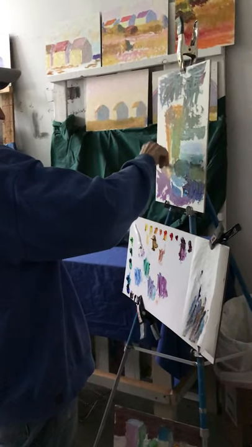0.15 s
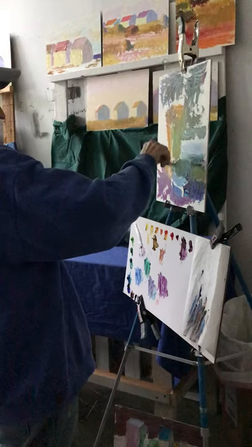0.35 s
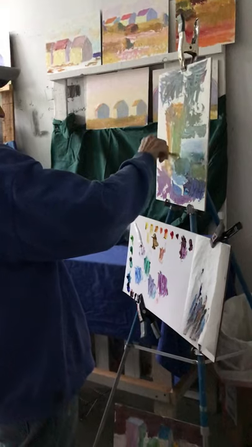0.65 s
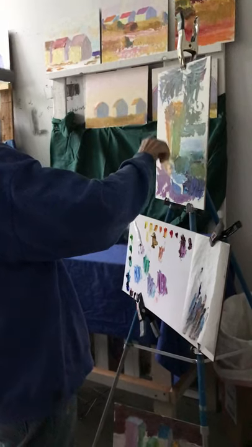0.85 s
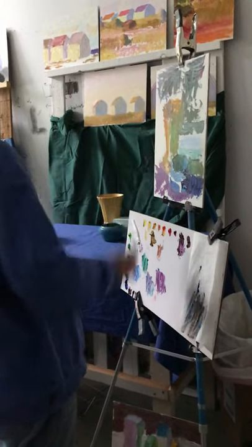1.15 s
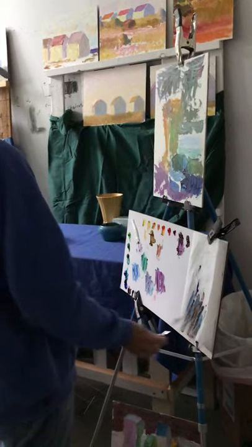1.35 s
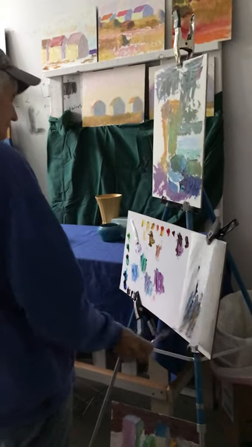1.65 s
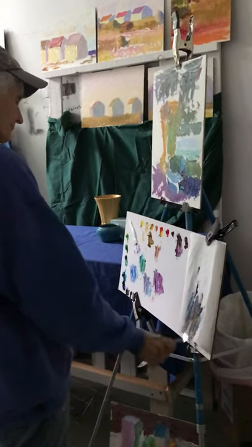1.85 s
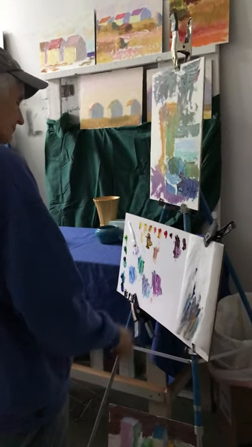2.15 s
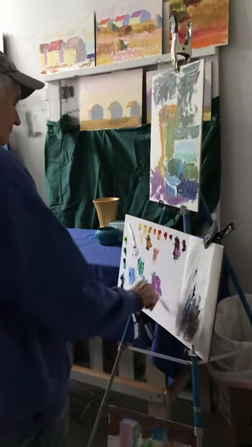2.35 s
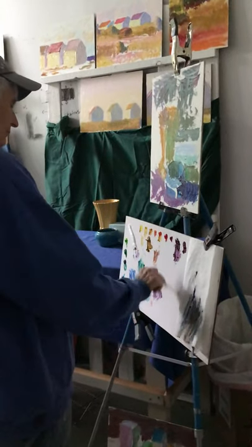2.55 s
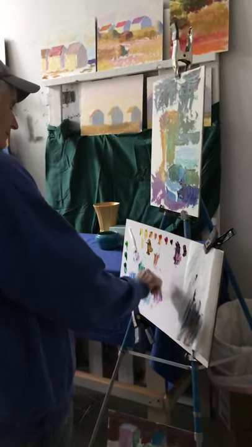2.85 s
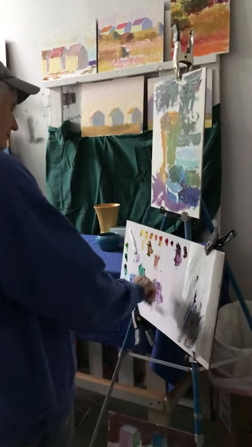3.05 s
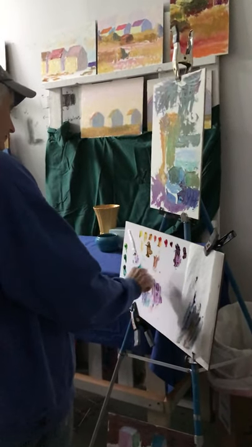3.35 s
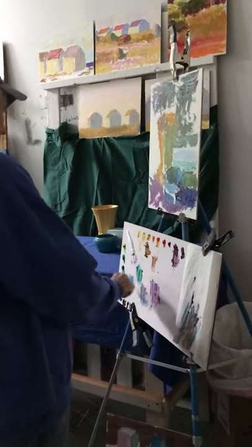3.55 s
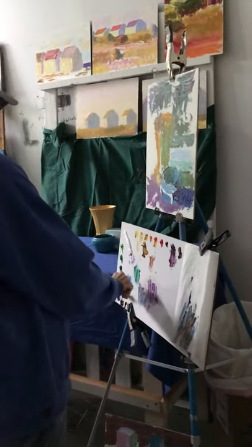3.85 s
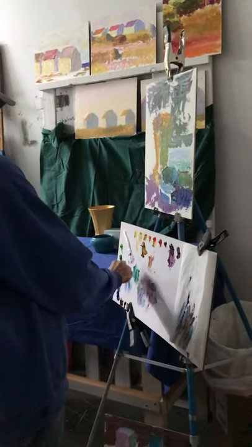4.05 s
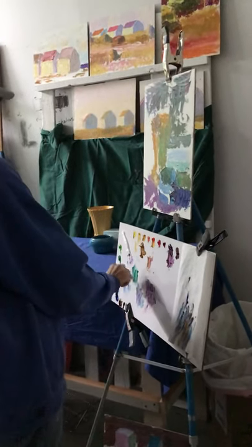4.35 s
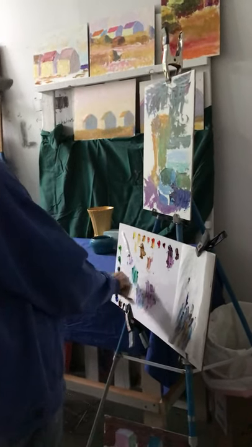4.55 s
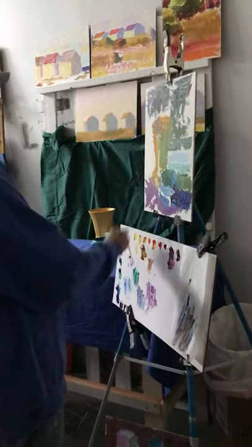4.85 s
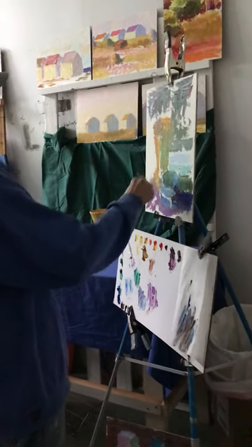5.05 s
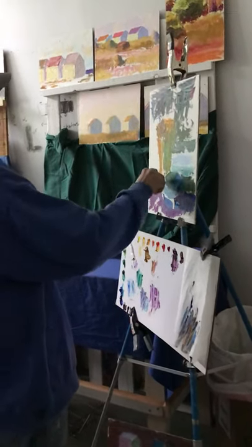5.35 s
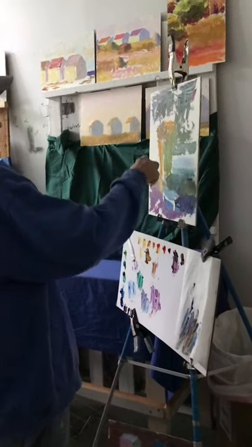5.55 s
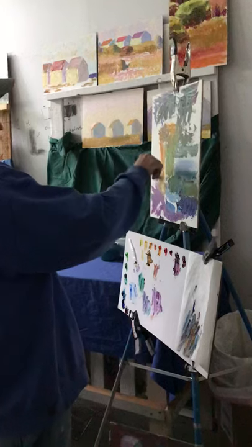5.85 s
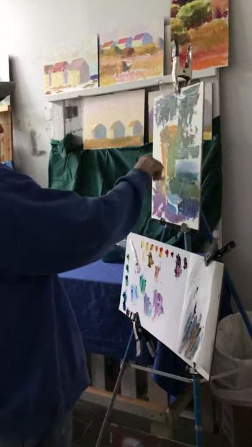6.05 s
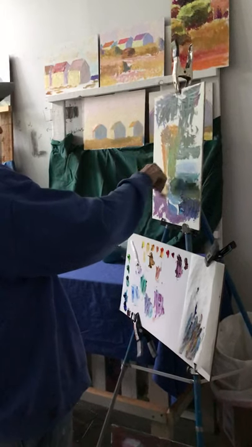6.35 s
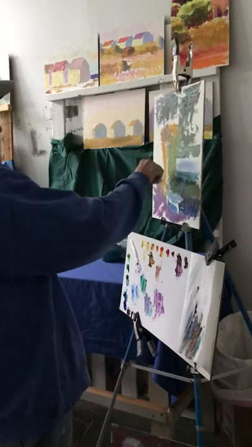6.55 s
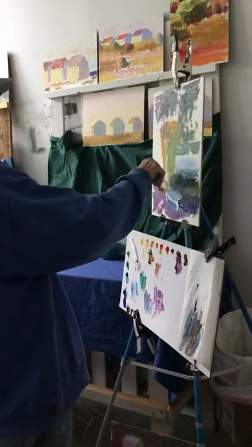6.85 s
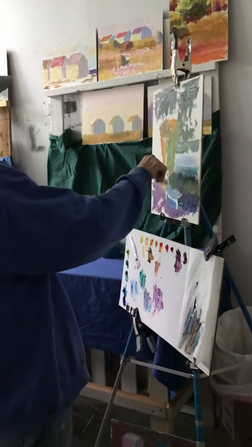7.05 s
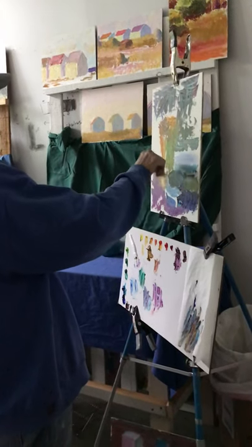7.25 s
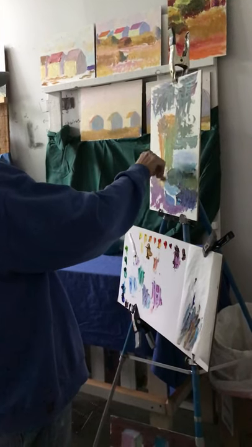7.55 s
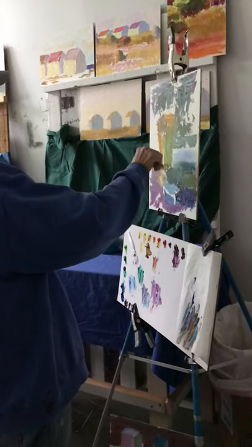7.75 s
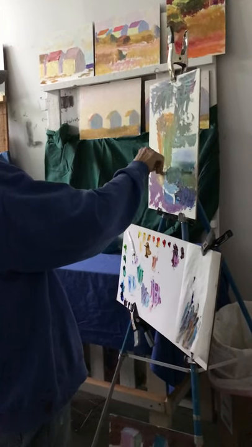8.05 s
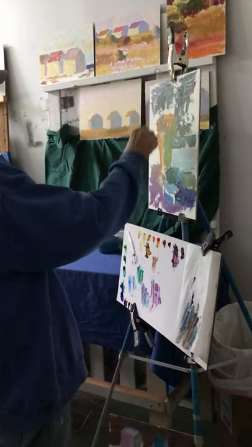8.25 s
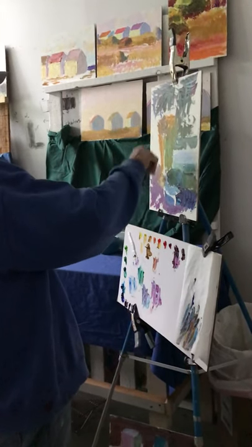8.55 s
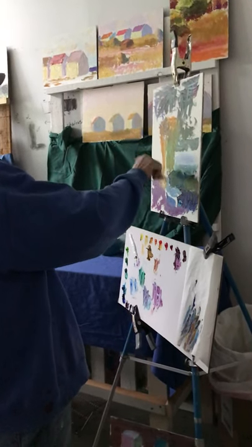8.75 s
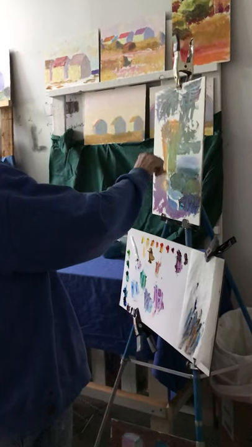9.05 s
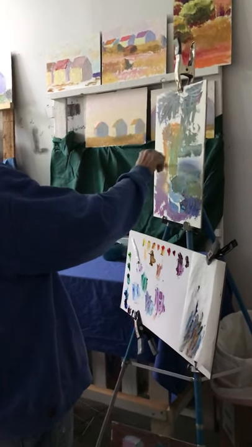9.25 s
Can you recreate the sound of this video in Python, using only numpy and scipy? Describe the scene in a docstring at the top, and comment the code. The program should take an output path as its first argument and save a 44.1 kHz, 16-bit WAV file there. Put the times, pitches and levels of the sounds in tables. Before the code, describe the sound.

Close by in a small, quiet studio, a paintbrush scrubs a quick run of dry, scratchy strokes across a canvas. After a pause, its wooden handle clacks once, sharply, against the easel. Softer taps and rubs follow as the brush works through wet paint on a palette. Then it returns to the canvas with another run of bristly strokes and small flicks that grow lighter. Soft air and a low hum lie underneath.

```python
"""A painter's brush scrubs quick strokes onto a canvas, near one microphone in a small, quiet studio.
Each stroke is a tap of contact, a short wait while the hairs bend, then a swell of tiny bristle slips
that ring the surface. The painter knocks the handle against the easel, works the brush through wet
paint on a palette and returns to the canvas. Behind it all lies room tone: soft air and a low hum."""
import sys
import numpy as np
from scipy import signal
from scipy.fft import rfft, irfft
from scipy.io import wavfile

SR = 44100
rng = np.random.default_rng(int(sys.argv[2]) if len(sys.argv) > 2 else 0)


def store_wav(level_fs):
    """Save 16-bit WAV to argv[1]."""
    pcm = np.round(np.clip(np.atleast_2d(level_fs), -1, 1) * 32767)
    wavfile.write(sys.argv[1], SR, pcm.T.astype(np.int16))


N = 414099
TAPS = 4096  # samples in a body's impulse response
FREQ = np.maximum(np.fft.rfftfreq(TAPS, 1 / SR), 1)
TIME = np.arange(N) / SR


def undb(db):
    """Decibels to gain."""
    return 10 ** (np.asarray(db) / 20)


def unit(x):
    """Scale to rms 1."""
    return x / np.sqrt(np.mean(x ** 2))


def add(track, start_s, x):
    """Mix x into the track from start_s on."""
    i = int(start_s * SR)
    x = x[max(-i, 0):]
    i = max(i, 0)
    track[i:i + len(x)] += x[:N - i]


def wander(size, rate_hz):
    """Smooth random motion with a spread near 1."""
    steps = np.arange(size) * rate_hz / SR
    return np.interp(steps, np.arange(TAPS), rng.standard_normal(TAPS)) * np.sqrt(1.5)


def peak(hz, width_hz):
    """Bell of one resonance, 1 at its centre."""
    return 1 / (1 + (2 * (FREQ - hz) / width_hz) ** 2)


def response(colour, modes=()):
    """Gain over frequency: a broad colour with resonance peaks on it."""
    colour_hz, colour_db = np.transpose(colour)
    broad = undb(np.interp(np.log(FREQ), np.log(colour_hz), colour_db))
    peaks = sum(undb(db) ** 2 * peak(hz, width) for hz, width, db in modes)
    return broad * np.sqrt(1 + peaks)


def ring(x, body, tilt_db=0):
    """Pass x through a causal body of unit power gain, tilted by tilt_db per octave."""
    gain = unit(body * undb(tilt_db * np.log2(FREQ)))
    cepstrum = irfft(np.log(gain + 1e-9))
    cepstrum[1:TAPS // 2] *= 2  # fold to minimum phase
    cepstrum[TAPS // 2 + 1:] = 0
    impulse = irfft(np.exp(rfft(cepstrum)))
    return signal.fftconvolve(x, impulse)


# Still air around the microphone. Each row: frequency in Hz, relative level in dB.
AIR_COLOUR = [(20, -6), (33, 5), (80, 2.5), (125, 3), (200, 2), (280, 4.5), (520, -3.5), (900, -1),
              (1300, -0.5), (2000, -5.5), (3200, -11.5), (5500, -17.5), (10000, -26), (16000, -32)]
# Slow drift of the room tone. Each row: time in seconds, hiss boost in dB, hum level in dB.
ROOM_TONE_DRIFT = [(0, 5.5, -62), (1.5, 0.5, -60), (2.7, 3.5, -61), (5.5, 4, -59.5), (6.4, 2.5, -62.5),
                   (8.5, 1, -60), (9.39, 2.5, -62.5)]


def room_tone(air_db=-55.5, hiss_hz=1500, hum_hz=52):
    """Steady air noise whose hiss drifts a little, over a gently wavering hum."""
    times, hiss_db, hum_db = np.transpose(ROOM_TONE_DRIFT)
    noise = ring(rng.standard_normal(N + TAPS), response(AIR_COLOUR))
    air = undb(air_db) * unit(noise[TAPS:N + TAPS])
    hiss = signal.sosfilt(signal.butter(1, hiss_hz, "high", fs=SR, output="sos"), air)
    air = air + hiss * (undb(np.interp(TIME, times, hiss_db)) - 1)
    phase = 2 * np.pi * hum_hz * TIME + 0.25 * wander(N, rate_hz=3)
    hum = np.sqrt(2) * np.sin(phase) * undb(0.8 * wander(N, rate_hz=5))
    return air + hum * undb(np.interp(TIME, times, hum_db))


# The studio's reverberation. Each row: frequency in Hz, seconds to fall by 60 dB.
STUDIO_DECAY = [(200, 0.42), (1000, 0.5), (3000, 0.47), (7000, 0.5), (11000, 0.33), (16000, 0.17)]


def studio(direct, reflections_db=-6, build_s=0.0033):
    """Diffuse reflections build up quickly behind the direct sound and die soonest in the treble."""
    t = TIME[:SR * 3 // 4]
    noise = rfft(rng.standard_normal(len(t)))
    log_hz = np.log(np.maximum(np.fft.rfftfreq(len(t), 1 / SR), 1))
    centres_hz, decays_s = np.transpose(STUDIO_DECAY)
    tail = 0
    for weights, t60 in zip(np.eye(len(centres_hz)), decays_s):
        band = irfft(noise * np.interp(log_hz, np.log(centres_hz), weights), len(t))
        tail = tail + band * np.exp(-np.log(1000) * t / t60)
    tail = tail * np.minimum(t / build_s, 1) ** 2
    reflections = signal.fftconvolve(direct, tail / np.linalg.norm(tail))[:N]
    return direct + undb(reflections_db) * reflections


def tap(db, contact_s, body, tilt_db, snap_db, snap_s=0.00025):
    """Contact begins with a snap, then a short crunch; both ring the body."""
    t = TIME[:TAPS]
    # a quick contact snaps harder than a slow one
    snap = undb(snap_db) * np.sqrt(snap_s / contact_s) * np.exp(-t / snap_s)
    crunch = rng.choice([-1, 1], TAPS) * (np.exp(-t / contact_s) + snap)
    # the crunch has no pitch of its own: the body gives the colour
    flatten = 1 / np.hypot(unit(np.abs(rfft(crunch))), 0.25)
    tick = ring(crunch, body * flatten, tilt_db)
    return undb(db) * tick * np.linalg.norm(crunch) / np.linalg.norm(tick)


def bristles(rise_s, length_s, grain_db, catch_db, swell, catch_hz=120, tuft_count=40):
    """Dense slips of single hairs; tufts catch on the surface while the pressure swells and lets go."""
    size = SR // 4
    slips = rfft(rng.standard_normal(size) * undb(grain_db * rng.standard_normal(size)))
    # each tuft rasps in its own band and grips or lets go by itself
    band = (tuft_count - 1) * np.sqrt(np.linspace(0, 1, len(slips)))
    tufts = [irfft(slips * np.maximum(1 - np.abs(band - k), 0), size) for k in range(tuft_count)]
    rasp = unit(sum(tuft * undb(3.1 * wander(size, rate_hz=45)) for tuft in tufts))
    arc = np.interp(TIME[:size], [0, rise_s, length_s], [0, np.pi / 2, np.pi])
    pressure = np.abs(np.sin(arc)) ** swell
    return rasp * pressure * undb(catch_db * wander(size, catch_hz))


def flick(db, body, tilt_db):
    """One brief rasp as the hairs spring straight."""
    slips = bristles(rise_s=0.0038, length_s=0.018, grain_db=8.0, catch_db=1.0, swell=1.35)
    return undb(db) * ring(slips, body, tilt_db)


# The easel's wood when struck. Each row: frequency in Hz, relative level in dB.
EASEL_COLOUR = [(100, -36), (300, -5), (600, -12.5), (1300, 3.5), (2200, -4), (3500, -3), (5000, -2.5),
                (7000, -6), (11000, 2.5), (14000, 3), (16000, -7)]
# Its resonances. Each row: frequency in Hz, width in Hz, height in dB over the broad colour.
EASEL_MODES = [(520, 87, 8.8), (700, 56, 15), (1200, 39, 2.3), (1700, 150, 7.7), (2815, 71, 22),
               (2930, 140, 10.3), (3130, 110, 14), (4080, 120, 12), (4320, 90, 5), (6040, 120, 9.6),
               (6650, 200, 11.4), (8310, 120, 9.8), (9600, 100, 6.3), (10800, 80, 3), (11100, 69, 6)]
# At the easel, two faint ticks and one hard clack. Each row: start in seconds, level in dB.
EASEL_KNOCKS = [(1.806, -60), (1.988, -53), (2.0153, -18.3)]


def easel(bounce_s=0.0052, bounce_db=-2.5):
    """The hard wooden handle snaps against the easel and bounces once on each knock."""
    out = np.zeros(N)
    wood = response(EASEL_COLOUR, EASEL_MODES)
    for start, db in EASEL_KNOCKS:
        for hit_s, hit_db in [(start, db), (start + bounce_s, db + bounce_db)]:
            knock = tap(hit_db, contact_s=0.0063, body=wood, tilt_db=0.85, snap_db=15, snap_s=0.00035)
            add(out, hit_s, knock)
    return out


# The palette when tapped and when rubbed. Each row: frequency in Hz, relative level in dB.
PALETTE_TAP_COLOUR = [(150, -24.5), (800, -2), (1500, 4.5), (2100, 2.5), (3100, -2), (4100, 8.5),
                      (5000, -3.5), (6100, 7.5), (7400, 1.5), (10600, 7.5), (11800, 1), (12800, 4),
                      (14200, -13), (16000, -6)]
PALETTE_RUB_COLOUR = [(100, -4.5), (270, 3), (550, -9), (1200, -4.5), (3200, -2.5), (6500, -1.5), (9500, 1),
                      (11500, -5.5), (13500, -11), (16000, -21)]
# Its resonances. Each row: frequency in Hz, width in Hz, height in dB over the broad colour.
PALETTE_MODES = [(1490, 74, 3.5), (1966, 47, 6.2), (2000, 42, 3.7), (2250, 40, 12), (2820, 210, 4.9),
                 (3820, 75, 2.3), (4530, 230, 2.6), (5680, 630, 4.1), (6700, 140, 3), (8250, 85, 1.8)]
# Hairs pulling out of the sticky paint. Each row: start in seconds, level in dB.
PALETTE_FLICKS = [(2.731, -55), (3.054, -53.5), (4.193, -56)]
# Strokes at the palette. Each row: start in seconds, tap level in dB, contact, wait and drag
# in seconds, rub level in dB, squeak in dB relative to the rub.
PALETTE_STROKES = [ (2.5382, -38.5, 0.009, 0, 0.16, -48.5, -9),
                   (2.8338, -38.5, 0.0055, 0.032, .15, -47, -12), (3.1996, -37, 0.011, 0, 0.14, -46.5, -16),
                   (3.9699, -41, 0.0024, 0.048, 0.13, -46.5, -6),
                   (4.3054, -39.5, 0.0029, .008, 0.14, -48, -5),
                   (4.612, -29.5, 0.0017, 0.049, 0.12, -48.5, -6)]


def palette(rise_share=0.53, neutral_contact_s=0.0041, softening_db=2.0):
    """Softer, duller strokes in wet paint; the hairs squeak in a narrow band, most in the later ones."""
    out = np.zeros(N)
    tapped = response(PALETTE_TAP_COLOUR, PALETTE_MODES)
    rubbed = unit(response(PALETTE_RUB_COLOUR, PALETTE_MODES))
    squeak = unit(peak(hz=6550, width_hz=850))
    for start, tap_db, contact_s, wait, drag, rub_db, squeak_db in PALETTE_STROKES:
        tilt_db = -softening_db * np.log2(contact_s / neutral_contact_s)  # longer contact, duller tap
        add(out, start, tap(tap_db, contact_s, tapped, tilt_db, snap_db=2.5))
        colour = np.hypot(rubbed, undb(squeak_db) * squeak)
        slips = bristles(rise_share * drag, drag, grain_db=3.5, catch_db=0.8, swell=0.94)
        add(out, start + wait, undb(rub_db) * ring(slips, colour))
    for start, db in PALETTE_FLICKS:
        add(out, start, flick(db, tapped, tilt_db=2.0))
    return out


def pressed(modes, detune=0.016):
    """Each stroke presses the cloth at another place, which shifts its resonances a little."""
    shifts = detune * rng.uniform(-1, 1, len(modes))
    return [(hz * (1 + shift), width, db) for (hz, width, db), shift in zip(modes, shifts)]


# The canvas when tapped and when rubbed. Each row: frequency in Hz, relative level in dB.
CANVAS_TAP_COLOUR = [(100, -69), (270, 10), (600, 13.5), (1300, 12), (2600, 7), (4300, 13), (6000, 12.5),
                     (7000, 3), (8000, 10.5), (9100, 1), (12400, 6), (14000, -1), (15500, 4)]
CANVAS_RUB_COLOUR = [(100, -8.5), (280, -4.5), (600, -7), (950, -2), (1400, 2.5), (2100, -1.5),
                     (3300, -1.5), (6000, 4.5), (8500, 4), (10600, 1.5), (13500, 1), (15000, 5.5),
                     (16000, -15.5)]
# Its resonances. Each row: frequency in Hz, width in Hz, height in dB over the broad colour.
CANVAS_MODES = [(394, 95, 5.5), (1460, 32, 9.5), (1720, 86, 13.5), (1928, 41, 11), (2447, 184, 8),
                (3010, 104, 11.5), (3690, 77, 13), (4358, 93, 11.5), (4770, 72, -10), (5700, 130, 5),
                (6330, 115, 4), (7010, 60, 4.5), (7700, 30, 7), (9650, 210, 5), (11940, 640, 4.5)]
# The brush nearly dry, then loaded with paint. Each lists: squeak in Hz, its relative level in dB,
# scratch in Hz, its boost in dB, swell exponent (higher is more gradual).
DRY_BRUSH = (9600, -11.5, 3600, 3.5, 0.57)
LOADED_BRUSH = (13400, -12.5, 2500, 3.5, 1.0)
# Hairs flicking the cloth, mostly as the brush lifts off. Each row: start in seconds, level in dB.
CANVAS_FLICKS = [(6.266, -51), (6.505, -47), (7.229, -41.5), (7.46, -54), (7.703, -39.5), (7.948, -50.5),
                 (8.081, -53.5), (8.954, -50), (9.234, -49)]
# Strokes at the canvas, near the microphone. Each row: start in seconds, tap level in dB,
# wait and drag in seconds, rub level in dB, boost of the cloth's drumming in dB.
CANVAS_STROKES = [ (-.065, -36, 0.0068, 0.087, -36.5, 3), (0.157, -32.5, 0.011, 0.11, -34.5, 5.5),
                  (0.3844, -33, 0.0072, 0.11, -36, 5.5), (0.6288, -40, 0.011, 0.097, -36.5, -0.5),
                  (.861, -31.5, 0, 0.093, -34.5, -1.5), (5.2913, -48.5, 0, 0.019, -54, 0),
                  (5.8749, -38.5, 0.042, 0.049, -33, -6), (5.95, -48, 0.00078, 0.059, -41.5, -5),
                  (6.1312, -28, 0.013, 0.11, -41.5, -7), (6.361, -39.5, 0.02, 0.096, -37, -4.5),
                  (6.601, -32.5, 0.01, 0.1, -34.5, -10.5), (6.8564, -28.5, 0.01, 0.12, -41.5, -7),
                  (7.092, -44.5, 0.011, 0.13, -44, -1), (7.33, -50, .008, 0.1, -49, -2),
                  (7.59, -53, 0, 0.065, -50, -14), (7.817, -52.5, 0.028, 0.075, -53, -1.5),
                  (8.061, -47, 0.038, 0.077, -52.5, -3), (8.815, -69, 0.00055, 0.15, -47.5, -0.5),
                  (9.0753, -38, .026, 0.12, -46.5, -3), (9.3506, -48, .01, .1, -54, 0)]


def canvas(rise_share=0.48, firm_tap_db=-29, firm_contact_s=0.0025, firm_rub_db=-34):
    """Dry, bright scrubbing: the taut cloth drums while the bent hairs scratch and squeak."""
    out = np.zeros(N)
    tapped = response(CANVAS_TAP_COLOUR, CANVAS_MODES)
    drum = peak(hz=1650, width_hz=800) + peak(hz=400, width_hz=130)
    for start, tap_db, wait, drag, rub_db, drum_db in CANVAS_STROKES:
        contact_s = firm_contact_s * 2 ** (0.12 * (firm_tap_db - tap_db))  # a lighter tap lingers
        add(out, start, tap(tap_db, contact_s, tapped, tilt_db=3.0, snap_db=-3))
        loaded = start > PALETTE_STROKES[0][0]
        squeak_hz, squeak_db, scratch_hz, scratch_db, swell = LOADED_BRUSH if loaded else DRY_BRUSH
        tilt_db = 0.02 - 0.16 * (firm_rub_db - rub_db)  # a lighter rub is duller
        rubbed = response(CANVAS_RUB_COLOUR, pressed(CANVAS_MODES))
        scratch = peak(scratch_hz, width_hz=1300)
        cloth = unit(rubbed * undb(drum_db * drum + scratch_db * scratch + tilt_db * np.log2(FREQ)))
        squeak = undb(squeak_db) * unit(peak(squeak_hz, width_hz=2000))
        slips = bristles(rise_share * drag, drag, grain_db=3.0, catch_db=2.12, swell=swell)
        add(out, start + wait, undb(rub_db) * ring(slips, np.hypot(cloth, squeak)))
    for start, db in CANVAS_FLICKS:
        add(out, start, flick(db, tapped, tilt_db=2.5))
    return out


def scene():
    """Each source reaches the microphone with its own reflections, over the room tone."""
    painting = sum(studio(source()) for source in (canvas, palette, easel))
    return (painting + room_tone())[None]


def record(dry):
    """A phone's microphone takes the scene in mono, and the phone cuts the top above 16 kHz."""
    lowpass = signal.ellip(10, 0.1, 70, 16000, fs=SR, output="sos")
    return signal.sosfilt(lowpass, dry)


dry = scene()
out = record(dry)
store_wav(out)
```